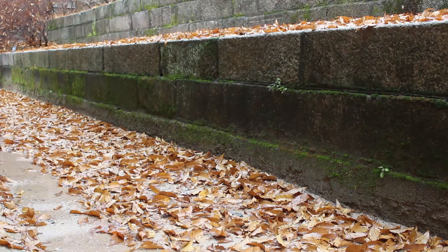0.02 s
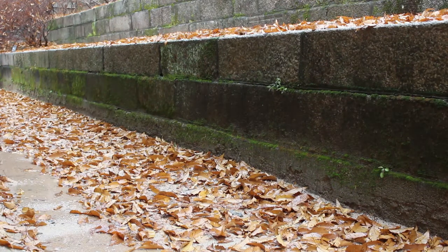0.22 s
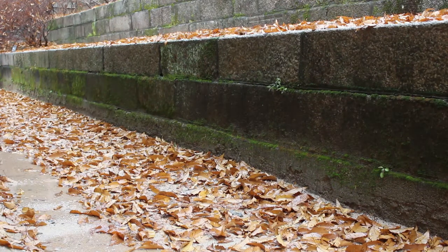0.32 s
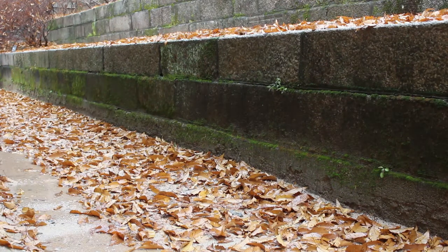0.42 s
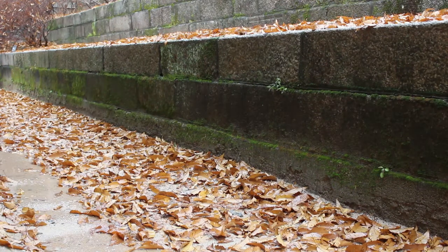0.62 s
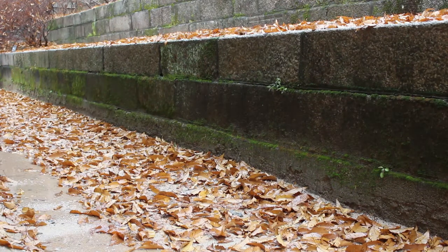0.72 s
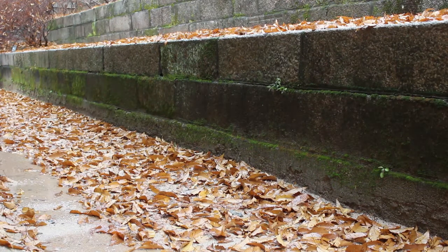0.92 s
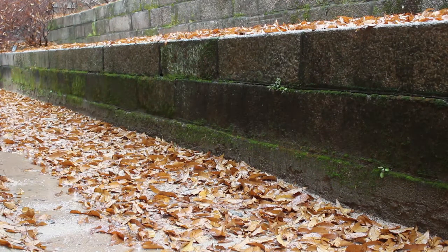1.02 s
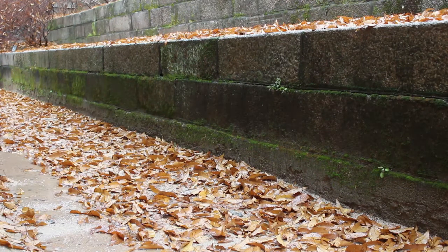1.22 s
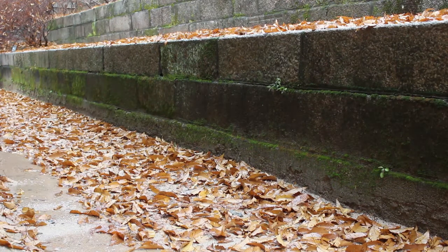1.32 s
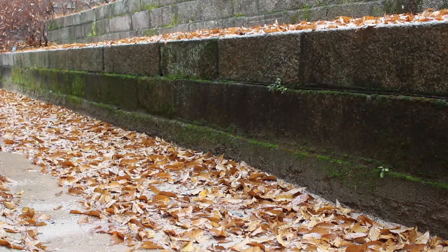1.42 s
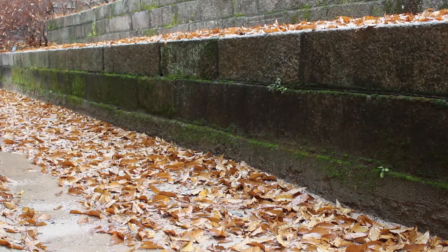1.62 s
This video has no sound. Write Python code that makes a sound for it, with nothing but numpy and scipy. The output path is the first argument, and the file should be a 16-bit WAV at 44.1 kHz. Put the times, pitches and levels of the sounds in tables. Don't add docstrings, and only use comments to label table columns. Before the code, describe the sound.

Light rain patters on dead leaves and a shallow puddle while a hoarse bird calls far off

```python
import sys
import numpy as np
from scipy import signal
from scipy.fft import rfft, irfft
from scipy.io import wavfile

SR = 44100
rng = np.random.default_rng(int(sys.argv[2]) if len(sys.argv) > 2 else 0)


def boost_factor(decibels):
    exponent = np.asarray(decibels, float) / 20
    return 10 ** exponent


def transcribe(signal):
    frames = np.atleast_2d(signal).T
    limited = np.clip(frames, -1, 1)
    pcm = np.round(limited * 32767).astype(np.int16)
    wavfile.write(sys.argv[1], SR, pcm)


N = 72765


def in_time(rows):
    s, *columns = np.transpose(rows)
    return [np.interp(np.arange(N) / SR, s, c) for c in columns]


def rms_one(x):
    return x / np.sqrt(np.mean(x ** 2) + 1e-20)


def drift(rate_hz, size=N):
    r = np.exp(-2 * np.pi * rate_hz / SR)
    noise = rng.standard_normal(size + SR)
    return rms_one(signal.lfilter([1], [1, -2 * r, r * r], noise)[SR:])


def colour(x, points):
    hz, db = np.transpose(points)
    log_hz = np.log(np.fft.rfftfreq(len(x), 1 / SR) + 1)
    return irfft(rfft(x) * boost_factor(np.interp(log_hz, np.log(hz), db)), len(x))


def coloured_noise(points):
    return rms_one(colour(rng.standard_normal(N), points))


def ring(x, hz, t60):
    r, w = boost_factor(-60 / (t60 * SR)), 2 * np.pi * hz / SR
    return signal.lfilter([0, np.sin(w)], [1, -2 * r * np.cos(w), r * r], x + 1e-18)


def filtered(x, order, hz, kind):
    return signal.sosfilt(signal.butter(order, hz, kind, fs=SR, output="sos"), x)


def drops(rows, width, hit_db):
    splash_db, splash_t60_s = -8.5, 0.048
    edge, lowest_hz = 1.26, 454
    size = 4410
    out, t = np.zeros(N + SR), np.arange(size) / SR
    for s, db, hz, t60 in rows:
        rattle = boost_factor(-60 * t / max(t60, .001))
        spray = boost_factor(splash_db - 60 * t / splash_t60_s)
        burst = rng.standard_normal(size) * (rattle + spray)
        burst[0] = boost_factor(hit_db) * np.sqrt(SR / hz)
        hit = filtered(burst, 2, [hz / width, min(hz * width, .45 * SR)], "band")
        hit = filtered(hit, 3, min(hz * width * edge, .45 * SR), "low")
        start = int(s * SR)
        out[start:start + size] += boost_factor(db) * hit / np.abs(hit).max()
    return filtered(out[:N], 3, lowest_hz, "high")


# (time [s], peak level [dB], leaf pitch [Hz], rattle t60 [s])
LEAF_PATS = [(.047, -26.5, 3400, 0.021), (.080, -31.5, 1245, 0.0074), (.124, -29, 1160, 0.023),
             (.2428, -29, 1980, 0.04), (.298, -28.5, 1600, 0.059), (.4245, -12, 2700, 0.036),
             (.7135, -24, 1510, 0.033), (.7235, -30, 1230, 0.06), (.7375, -29, 1310, 0.033),
             (.807, -31, 925, 0.059), (.820, -28.5, 560, 0.056), (.929, -33.5, 810, 0.027),
             (.947, -26, 1210, 0.0095), (1.118, -28, 2880, 0.04), (1.2435, -21, 1660, 0.033),
             (1.251, -30, 1490, 0.023), (1.400, -29, 1300, 0.016), (1.4476, -30.5, 960, 0.025),
             (1.4495, -25.5, 2650, 0.048), (1.520, -28.5, 1860, 0.014), (1.578, -30.5, 1050, 0.018),
             (1.619, -35, 1350, 0.0088)]


def pats():
    return drops(LEAF_PATS, width=1.4, hit_db=8)


# (time [s], peak level [dB], pitch [Hz], rattle t60 [s])
SPLASH_TICKS = [(.0795, -28.5, 5560, .008), (.090, -39.5, 9000, 0.0055), (.124, -30, 5400, 0.0098),
                (.1995, -31, 5200, 0.01), (.2405, -30.5, 7070, .005), (.2775, -38, 13300, .005),
                (.2875, -38, 13300, .005), (.3205, -32, 10500, 0.02), (.4245, -24, 4600, .012),
                (.545, -34, 7000, 0.0045), (.849, -26.5, 4980, 0.059), (.855, -29, 4500, 0.038),
                (.917, -28.5, 4930, 0.015), (.925, -29, 4570, 0.027), (1.025, -29.5, 5900, 0.0054),
                (1.113, -37.5, 8200, .03), (1.357, -28.5, 10600, 0.0058), (1.3675, -39, 11000, .004),
                (1.3936, -32, 7400, 0.02), (1.3955, -38, 14300, .015), (1.4915, -35, 11300, .004)]


def ticks():
    return drops(SPLASH_TICKS, width=1.13, hit_db=5)


# (time [s], peak level [dB], middle pitch [Hz], rattle t60 [s])
STONE_SMACKS = [(.2404, -19, 2300, .003), (.2774, -29, 4500, .004), (.2854, -27, 5200, .004),
                (.2964, -18.5, 3800, .006), (.3042, -28, 5200, .004), (.3189, -28, 8000, .004),
                (.3637, -25, 2300, .003), (.3639, -33, 9500, .004), (.4222, -1, 1850, .0024),
                (.4231, -23.5, 670, .013), (.4225, -27, 10500, .006), (.7113, -30, 2500, .005),
                (.7209, -26, 1700, .006), (1.1125, -27, 1600, .04), (1.1135, -32, 9500, .025),
                (1.1692, -22.5, 2000, .006), (1.1695, -31, 9500, .008), (1.1881, -27, 3300, .006),
                (1.3549, -18.5, 2100, .007), (1.3552, -25, 9500, .012), (1.3902, -21, 10500, .009),
                (1.3905, -18, 2500, .011), (1.6455, -33, 6200, .005)]


def smacks():
    return drops(STONE_SMACKS, width=2.2, hit_db=11)


# (time [s], peak level [dB], pitch [Hz], swell [ms])
RINGING_DROPS = [(.2403, -24.5, 2340, 0.44), (0.2773, -25, 2370, 0.63), (0.2774, -27, 8370, 0.6),
                 (0.2866, -34, 8500, .8), (0.3194, -20, 9700, 0.37), (0.3189, -23, 10800, .7),
                 (0.3185, -25.5, 4280, 0.75), (0.324, -28, 11200, 0.46), (0.3229, -25, 9000, 0.33),
                 (0.3641, -23.5, 700, 0.75), (.364, -29, 7500, 0.32), (0.4229, -25.5, 7300, 0.68),
                 (0.422, -23, 8730, 0.67), (.4225, -14, 2050, 0.26), (.4230, -10, 4105, 0.79),
                 (0.4265, -12, 2070, 0.99), (0.4305, -26, 2200, 1.7), (0.4332, -21, 1760, .8),
                 (0.7112, -10.5, 1500, 0.76), (.7108, -27.5, 5860, 0.52), (0.7116, -19.5, 4570, 0.62),
                 (.7115, -24.5, 2510, 1), (0.7112, -29, 3530, 0.93), (0.713, -23, 740, 1.38),
                 (0.7203, -26, 3810, .7), (0.721, -14.5, 1330, 0.66), (0.7229, -25, 826, 0.82),
                 (0.7273, -29, 1500, 0.91), (1.3548, -47, 3430, 0.72), (1.3902, -11.5, 7640, 0.26),
                 (1.3902, -14.5, 4000, 0.35), (1.3903, -26, 5220, 0.81), (1.3883, -26.5, 1360, 0.64),
                 (1.3957, -33, 4140, 2.1), (1.47, -36.5, 3440, 2.4), (1.5136, -28, 1390, 1.4)]


def plinks():
    size = 1323
    out, t = np.zeros(N + SR), np.arange(size) / SR
    for s, db, hz, swell_ms in RINGING_DROPS:
        u = 1000 * t / max(swell_ms, .1)
        swell = (u * np.exp(1 - u)) ** 2
        start = int(s * SR)
        out[start:start + size] += boost_factor(db) * swell * np.sin(2 * np.pi * hz * t)
    return out[:N]


# (time [s], peak level [dB], pitch [Hz])
LEAF_FLECKS = [(0.8091, -39, 6420), (0.8091, -30, 6800), (0.8333, -37, 7330), (0.8434, -32, 6480),
               (0.852, -32, 6010), (0.8644, -33, 9040), (0.8814, -37, 8120), (0.892, -40, 6300),
               (0.9083, -26, 6190), (0.9294, -28.5, 6600), (0.949, -35, 6140), (0.9574, -34, 6610),
               (0.9654, -39, 6560), (0.9764, -37, 8330), (1.046, -34, 6140), (1.0634, -33, 6450)]


def flecks():
    t60_s, trim_db = 0.0064, -0.5
    rows = [(s, db + trim_db, hz, t60_s) for s, db, hz in LEAF_FLECKS]
    return drops(rows, width=1.4, hit_db=5)


# (pitch [Hz], width [Hz], level [dB])
LEAF_HOLLOWS = [
    (1480, 220, -9),
    (2250, 170, 0),
    (2800, 420, -9),
]


def hollow():
    start_s, settled_s, level_db, t60_s = .434, .49, -31, 0.2
    t = np.arange(N) / SR - start_s
    noise = rng.standard_normal(N)
    body = sum(boost_factor(db) * rms_one(ring(noise, hz, 2.2 / width)) for hz, width, db in LEAF_HOLLOWS)
    dying = boost_factor(level_db - 60 * np.maximum(t, 0) / t60_s)
    onset = np.clip(t / 0.0012, 0, 1)
    settling = np.clip((settled_s - start_s - t) / .022, .3, 1)
    return dying * onset * settling * body


def bubble():
    start_s, length_s, level_db = .2435, .036, -40
    from_hz, to_hz = 4230, 5550
    u = np.clip((np.arange(N) / SR - start_s) / length_s, 0, 1)
    hz = from_hz + (to_hz - from_hz) * u ** 0.8
    swell = np.sqrt(np.sin(np.pi * u).clip(0))
    return boost_factor(level_db) * swell * np.sin(2 * np.pi * np.cumsum(hz) / SR)


# (time [s], level [dB])
SHOWER_CURVE = [(0, 1), (.1, 1), (.22, 1), (.27, 3), (.36, 3.5), (.40, 0.5), (.52, -4.5), (.60, -7),
                (.70, -1), (.795, 0), (.81, 3), (.96, 3), (1.10, 0.5), (1.15, -5), (1.34, -3.5),
                (1.41, 0.5), (1.47, -5.5), (1.65, -22)]


def shower():
    return in_time(SHOWER_CURVE)[0]


# (pitch [Hz], level [dB per Hz])
PATTER_COLOUR = [(300, -19), (600, -7), (1400, -15.5), (3300, -1.5), (4600, 4.5), (6200, 2.5), (7500, 1),
                 (16000, -14.5)]


def patter():
    level_db, drops_per_s, size_spread_db, grain_cycles = -48.5, 5000, 2.5, 7.4
    sizes = boost_factor(size_spread_db * np.minimum(rng.exponential(1, N), 4.5)) * rng.choice([-1, 1], N)
    born = rng.random(N) < drops_per_s * boost_factor(1.5 * drift(12)) / SR
    clicks = sizes * born
    pitch_number = rng.integers(0, 24, N)
    grains = np.zeros(N)
    for k, hz in enumerate(np.geomspace(400, 16000, 24)):
        t60 = grain_cycles / hz
        once = ring(clicks * (pitch_number == k), hz, t60)
        grains += ring(once, hz, t60) * hz / SR
    return boost_factor(level_db + shower()) * rms_one(colour(grains, PATTER_COLOUR))


# (pitch [Hz], level [dB per Hz])
MIST_COLOUR = [(3000, -31), (6000, 3.5), (9000, -1), (12000, -13), (16000, -11)]


def mist():
    level_db, follows = -61.5, 3.93
    flutter_db = 1.5 * drift(60)
    return boost_factor(level_db + follows * shower() + flutter_db) * coloured_noise(MIST_COLOUR)


# (time [s], length [s], level [dB], pitch [Hz])
BIRD_CALLS = [
    (-.2, 0.29, -46, 2300),
    (0.05, 0.12, -45, 2911),
    (0.322, .16, -43, 2883),
    (0.608, 0.14, -44, 2883),
    (0.964, 0.14, -46.5, 2840),
    (1.228, 0.15, -46.5, 3000),
]


def bird():
    rise, fall, edge_s, hoarse, first_partial_db = .2, 0.31, 0.0081, 0.13, -0.5
    yard_t60_s, yard_db = 0.79, -1.5
    t = np.arange(-SR // 2, N) / SR
    calls = np.zeros(len(t))
    wobble = 1 + hoarse * drift(247.94, size=len(t))
    for s, length, db, hz in BIRD_CALLS:
        u = np.clip((t - s) / length, 0, 1)
        arch = 1 - rise * (1 - u) ** 3 - fall * u ** 3
        phase = 2 * np.pi * np.cumsum(hz * wobble * arch) / SR
        level = boost_factor(db) * np.clip(np.minimum(u, 1 - u) * length / edge_s, 0, 1)
        calls += level * (boost_factor(first_partial_db) * np.sin(phase) + np.sin(2 * phase))
    tail = rng.standard_normal(SR) * boost_factor(-60 * np.arange(SR) / SR / yard_t60_s)
    echoes = signal.fftconvolve(calls, boost_factor(yard_db) * tail / np.sqrt(np.sum(tail ** 2)))
    return (calls + echoes[:len(t)])[SR // 2:]


# (pitch [Hz], level [dB per Hz])
FAR_RAIN_COLOUR = [(59, -45), (100, -6), (229, -10.5), (415, -2), (502, -3.5), (1450, -2), (2080, -7.5),
                   (4870, -12), (16000, -33.5)]


def far_rain():
    level_db, follows = -43, 0.12
    breathing_db = 1.94 * drift(10.0)
    return boost_factor(level_db + follows * shower() + breathing_db) * coloured_noise(FAR_RAIN_COLOUR)


# (time [s], level [dB])
BREEZE_CURVE = [(0.0, -57), (0.454, -56.5), (0.486, -62.5), (0.706, -52.5), (0.766, -46), (1.158, -50),
                (1.65, -52.5)]


def breeze():
    db, = in_time(BREEZE_CURVE)
    low = filtered(rng.standard_normal(N + SR), 2, [12, 49.2], "band")[SR:]
    return boost_factor(db) * rms_one(low)


# (pitch [Hz], level [dB per Hz])
HISS_COLOUR = [(100, -30), (400, -4), (1500, -10.5), (5000, -10.5), (9000, -2.5), (16000, 1)]


def hiss():
    return boost_factor(-59.5) * np.array([coloured_noise(HISS_COLOUR) for _ in range(2)])


def scene():
    near = pats() + ticks() + smacks() + plinks() + flecks() + hollow() + bubble()
    around = patter() + mist() + bird() + far_rain() + breeze()
    return np.tile(near + around, (2, 1))


def band_limit(x):
    return signal.sosfilt(signal.butter(12, 16500, fs=SR, output="sos"), x)


def record(dry):
    noisy = dry + hiss()
    top_cut = signal.cheby2(10, 33, 15900, fs=SR, output="sos")
    mix = np.clip(signal.sosfilt(top_cut, noisy), -1, 1)
    return band_limit(mix)


dry = scene()
out = record(dry)
transcribe(out)
```